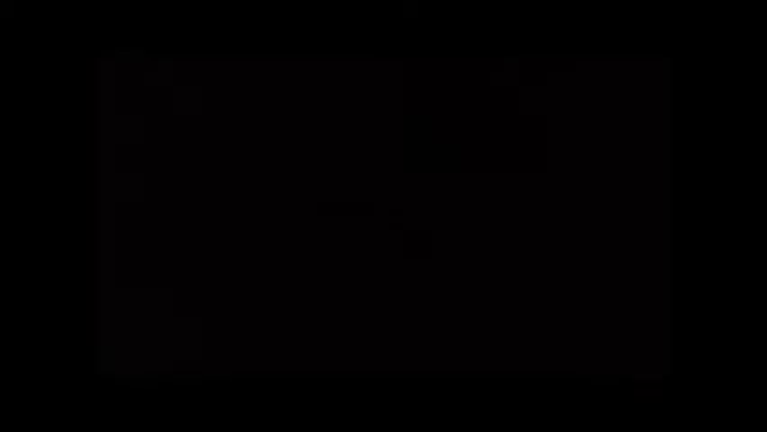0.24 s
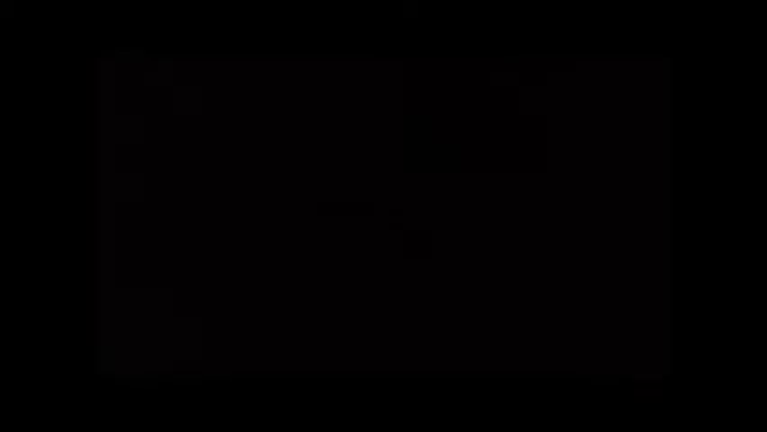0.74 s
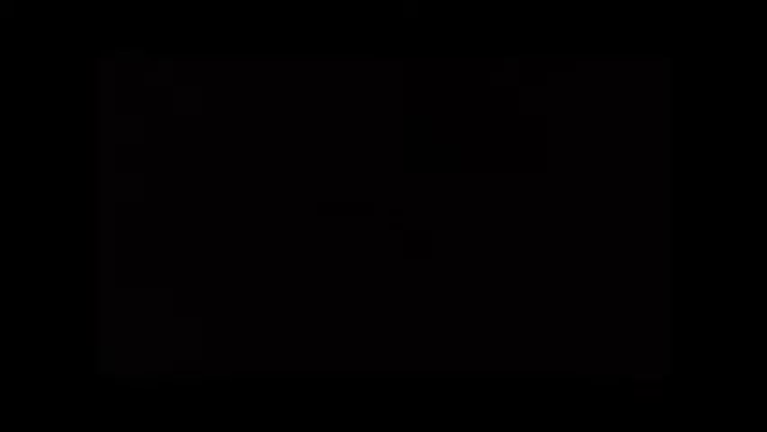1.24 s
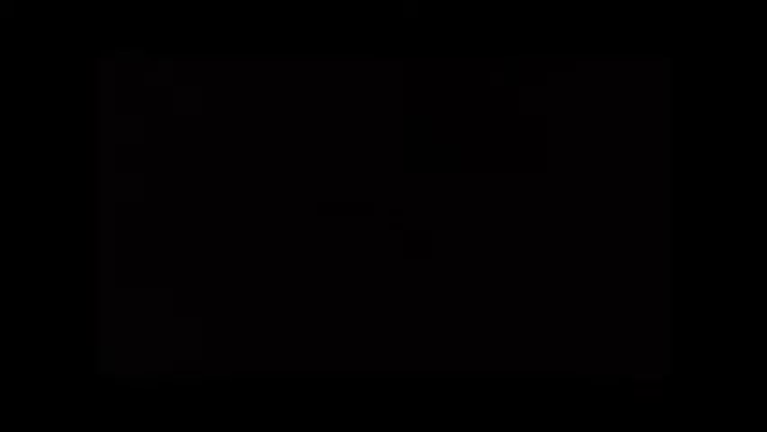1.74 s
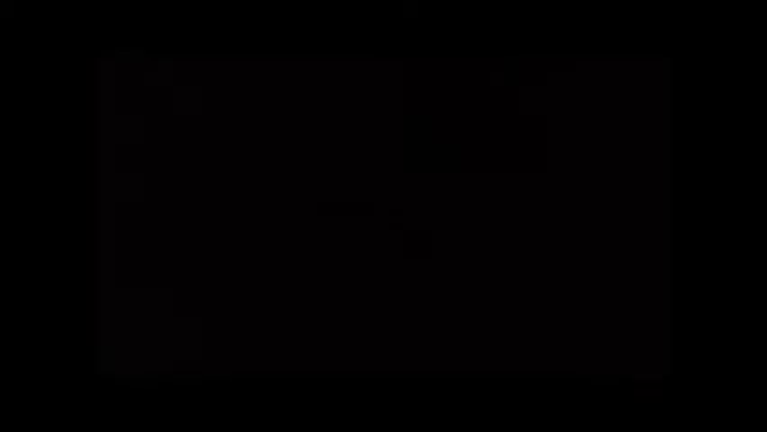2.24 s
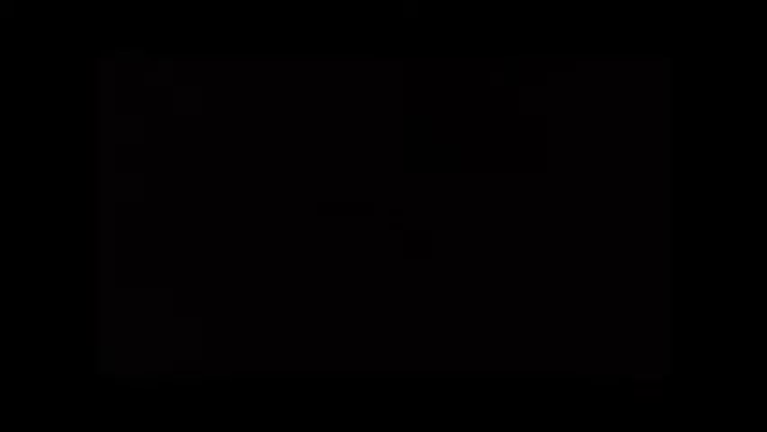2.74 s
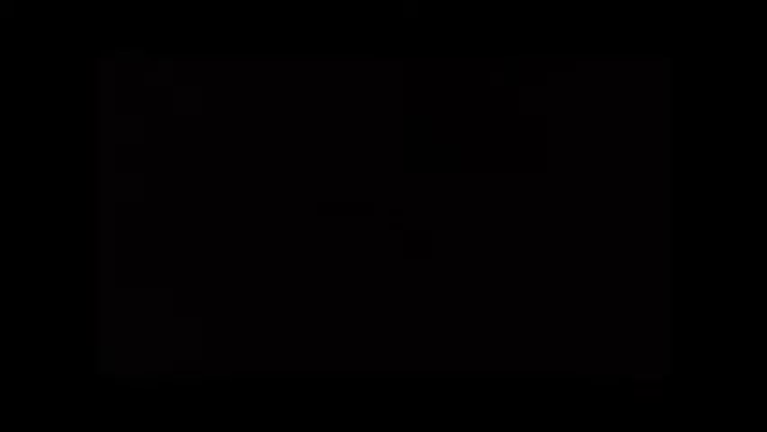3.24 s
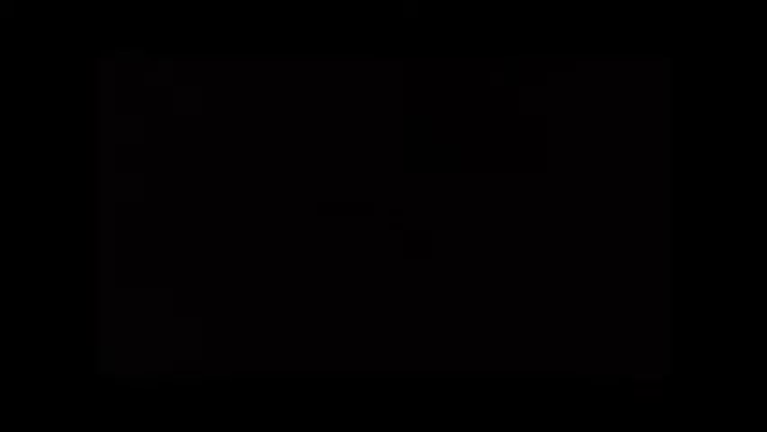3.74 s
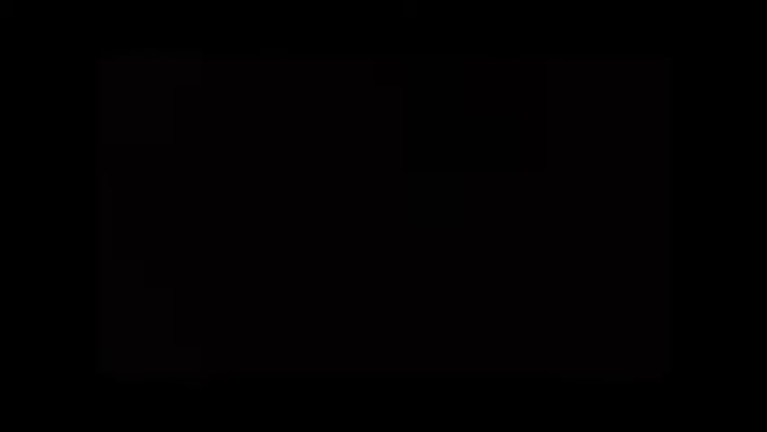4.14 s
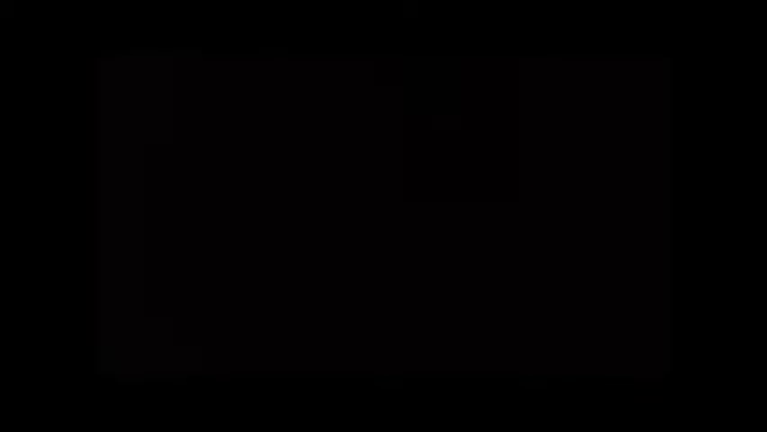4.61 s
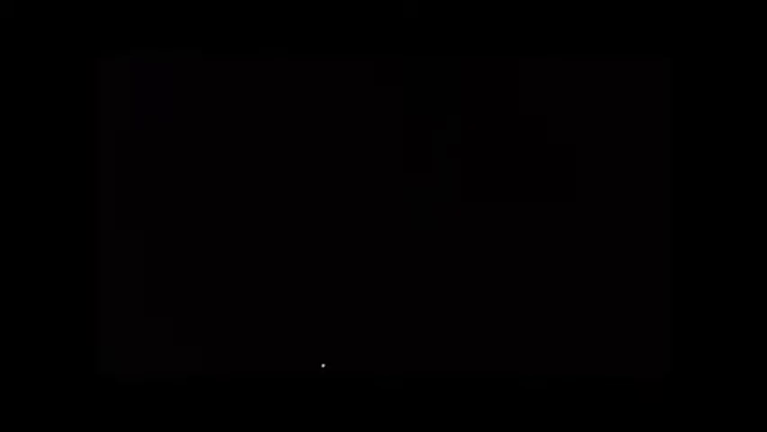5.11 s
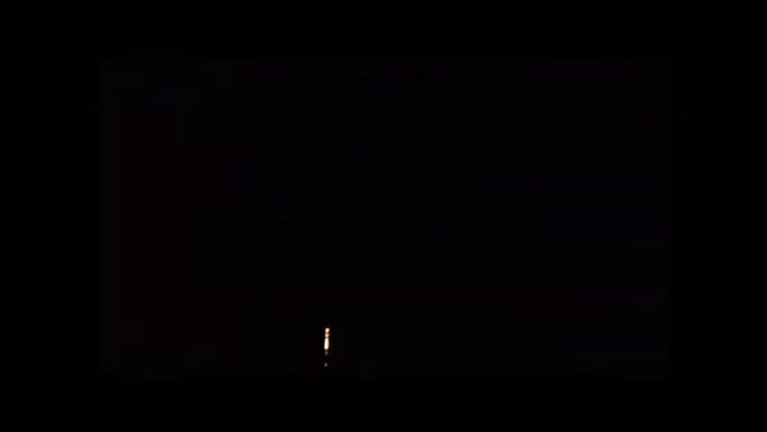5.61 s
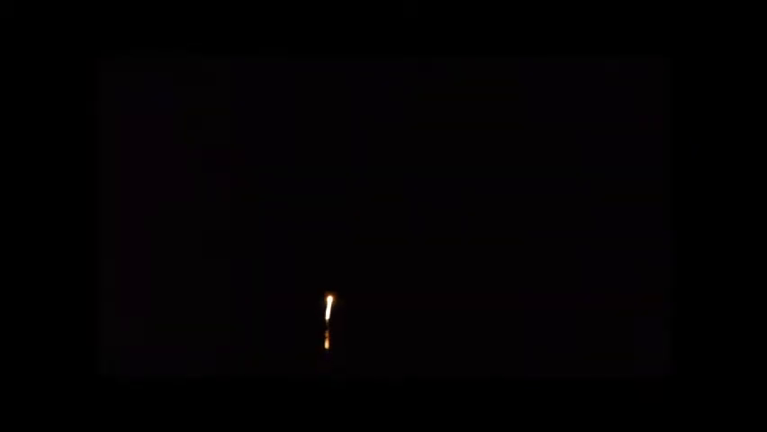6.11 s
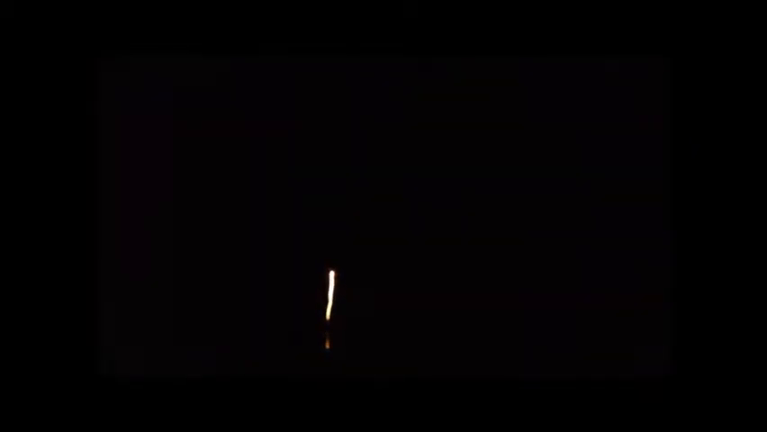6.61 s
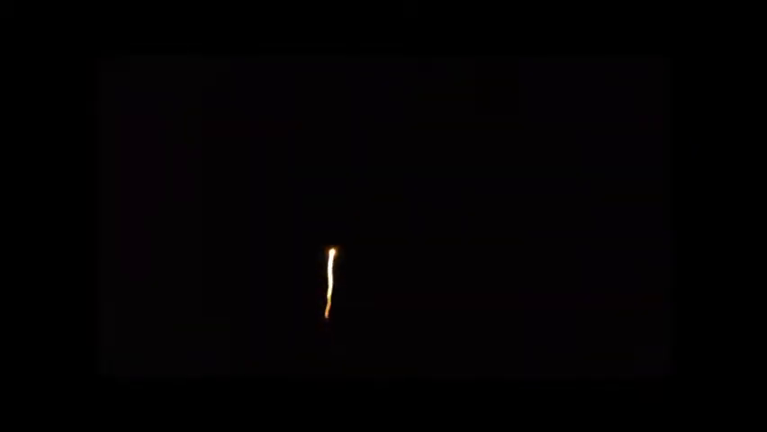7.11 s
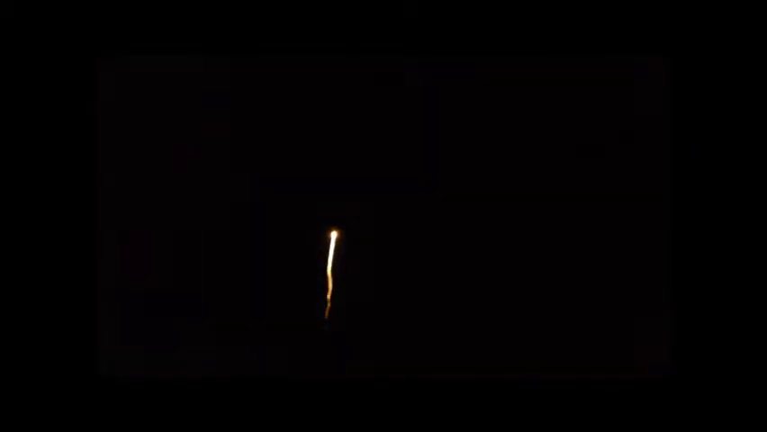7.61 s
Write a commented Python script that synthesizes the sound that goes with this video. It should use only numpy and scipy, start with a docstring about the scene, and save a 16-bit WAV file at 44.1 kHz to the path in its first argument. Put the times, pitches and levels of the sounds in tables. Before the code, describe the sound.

A quiet summer night outdoors, lasting about 7.9 seconds. From the start, several near tree frogs give brief, rasping, upward-sliding croaks around 3.3 to 3.5 kHz, roughly four per second each, overlapping and slipping out of step. Behind them lie a dense blurred frog chorus, shimmering distant insects and soft low air with hiss. A bush cricket buzzes thinly near 9 kHz in three swelling phrases: 0 to 2.2, 2.5 to 4.6 and 4.9 to 6.8. After 3.4 the near croaks turn sparse and faint, and the chorus recedes. Short dry frog rattles come at 5.5 and 6.3, with a barely audible peep at 6.15. At 6.75 a very loud firework bang cracks, with a hollow tube thump, hiss and sparks; the background ducks. Puffs of gas follow at 6.9 and 7.1 to 7.2, then a weaker, duller bang at 7.26, more puffs, and an uneven echo rolling to the end.

```python
"""Summer night with a firework

Tree frogs (larynx pulses ringing a vocal sac) call in turns over a far chorus; a bush cricket buzzes in
long swells of wing strokes, and another frog rattles twice. Then a firework bangs twice with bursts of gas,
shock fronts and sparks, and the bangs roll round the countryside. Far insects and night air (shaped noise)
lie beneath; the recorder's gain ducks at the first bang and creeps back."""
import sys
import numpy as np
from scipy import signal
from scipy.fft import irfft
from scipy.io import wavfile

SR = 44100
rng = np.random.default_rng(int(sys.argv[2]) if len(sys.argv) > 2 else 0)


def to_wav(sig):
    """Store sig (one row per channel, or 1-D mono) as 16-bit WAV at the path in sys.argv[1].

    Samples outside -1..1 are clipped; the rate is SR.
    """
    pcm = np.clip(np.atleast_2d(sig), -1, 1) * 32767
    pcm = np.round(pcm).astype(np.int16)
    wavfile.write(sys.argv[1], SR, pcm.T)  # frames by channels


N = 346626
T = np.arange(N) / SR  # time [s]

# Phrases of the bush cricket: (start [s], end [s], swell time [s])
CRICKET_PHRASES = [(-.1, 2.24, 1.2), (2.498, 4.61, 0.9), (4.852, 6.8, 1.15)]
# Bouts of evenly repeated croaks from near tree frogs:
# (first call [s], last call [s], period [s], call length [s], final pitch [Hz], first level [dB], fading [dB/s])
CROAK_BOUTS = [(.087, 3.202, .26, .104, 3276, -48.0, 0.4), (.308, 1.405, .22, 0.084, 3280, -51.5, 0),
               (1.587, 2.712, .225, 0.083, 3276, -50.0, 0.5), (-.016, 3.342, .258, .092, 3545, -52.5, 0.94)]
# Single croaks, most of them weaker: (time [s], final pitch [Hz], level [dB])
SINGLE_CROAKS = [(3.4, 3250, -52), (3.63, 3320, -56.5), (3.99, 3370, -59.5), (4.27, 3300, -61.5),
                 (4.57, 3290, -62), (4.84, 3700, -64), (5.11, 3570, -63), (6.48, 3650, -65)]
# Upward slide of a croak, larger in lower voices: (final pitch [Hz], slide [share of the pitch])
PITCH_SLIDE = [(3300, 0.13), (3600, .075)]
# Resonance of the frog's body beside its vocal sac: (frequency [Hz], relative level [dB])
BODY_RESONANCE = [(500, -35), (1200, -10), (1470, 5.5), (1750, 3.5), (2100, -4.5), (2400, -1.5),
                  (3300, -7.5), (4100, -8), (5000, -12.5), (5450, -18.5), (7000, -14.5), (9500, -57)]
# Level of the far frogs: (time [s], level [dB])
CHORUS_LEVEL = [(0, -55), (3.6, -57.5), (5.4, -61.5), (6.4, -58.5), (7.86, -57.5)]
# Spectrum of the far insects before their level curve: (frequency [Hz], density [dB per Hz])
INSECT_SPECTRUM = [(5300, -125), (5950, -101), (6400, -101), (6950, -96.5), (7500, -106), (8400, -104),
                   (9200, -108), (9800, -125)]
# Level change of the far insects: (time [s], level [dB])
INSECT_LEVEL = [(0, .5), (3.1, 0), (3.4, -2), (6.6, .3), (7.3, -7), (7.86, -3.5)]
# Night air and microphone hiss before their level changes: (frequency [Hz], density [dB per Hz])
AIR_SPECTRUM = [(25, -102), (60, -107), (110, -96), (200, -89), (270, -90.5), (400, -93), (780, -92.5),
                (1200, -97), (2200, -103), (4000, -108), (5400, -112), (11000, -114.5), (14000, -112)]
# Level change of the low part of the night air: (time [s], level [dB])
LOW_AIR_LEVEL = [(0, -0.2), (2.4, 2.6), (4.0, -0.14), (7.86, 1.5)]
# Rattles of another frog: (start [s], length [s], mid-rattle level [dB])
FROG_RATTLES = [(5.4825, .068, -41.5), (6.3264, 0.1, -37.3)]
# Lesser rushes of gas:
# (peak time [s], level [dB], length [s], upper edge [Hz], tube ring relative to the jet [dB])
GAS_PUFFS = [(6.666, -39.5, 0.037, 6000, -8), (6.889, -29.5, 0.06, 1500, 2.5),
             (7.11, -31.5, 0.023, 7000, -24), (7.183, -26, 0.022, 5500, -7), (7.319, -30, 0.042, 3000, -27),
             (7.475, -32, 0.052, 5000, -7.5), (7.771, -36, .028, 264, -30)]
# Bangs, each a blast of gas, a shock front and an echo:
# (gas peak time [s], gas level [dB], rise [s], fall [s], gas upper edge [Hz], tube ring relative to the jet [dB],
#  shock time [s], shock level before filtering [dB], overpressure time [s], shock upper edge [Hz], echo level [dB])
FIREWORK_BANGS = [(6.7458, 2, 0.0027, 0.0028, 5500, -1, 6.7537, 13, 0.00037, 2840, -25.5),
                  (7.257, -12.5, 0.0061, 0.012, 2960, -14, 7.2602, -1.5, 0.00043, 2080, -36)]
# Colour of the gas jets: (frequency [Hz], relative level [dB])
GAS_COLOUR = [(70, -31), (170, 7.5), (350, 7), (600, 5), (1000, 2), (1520, 5), (1950, -7.5), (3100, -8),
              (4200, -18), (5400, -25), (6400, -20.5), (10000, -33), (15000, -49.5)]
# Colour of the rolling echo: (frequency [Hz], relative level [dB])
ECHO_COLOUR = [(40, -50), (85, -24), (125, -8), (180, 3.5), (260, -1), (400, -13), (540, 0), (640, -10),
               (780, -5.5), (1000, -8.5), (2200, -18.5), (3500, -27), (5000, -35.5), (9000, -56.5)]
# Spectrum of the sparks before their level change: (frequency [Hz], density [dB per Hz])
SPARK_SPECTRUM = [(2000, -112), (5000, -92), (8000, -100), (11000, -103), (14000, -120)]

STROKE_HZ, STROKE_FALL_HZ, STROKE_S = 8940, 1450, 0.0072  # a wing stroke starts high and falls ever faster
SOFT_DB, SOFT_DROP_HZ = -9, 350  # a phrase begins softer and lower
SINGLE_CROAK_S = 0.093
PULSE_SPEEDUP = 0.0898  # share by which the pulses quicken over a croak
CROAK_PEAK_SHARE, CROAK_START_DB, CROAK_END_DB = 0.49, -10.5, -8.5
FAR_LOW_HZ, FAR_SPREAD_HZ, FAR_SPREAD_DB = 3226, 496, 4.5  # the far frogs differ in pitch and loudness
RUMBLE_EDGE_HZ, HISS_DB = 2300, 0.3
CLICK_PERIOD_S, THROAT_HZ = .0169, 2554
RATTLE_EDGE_DB, RATTLE_SAG = -13, .16  # weaker at both ends; share of the pitch lost by the end
PEEP_START_S, PEEP_LENGTH_S, PEEP_HZ, PEEP_DB = 6.15, .12, 2580, -68.5
TUBE_HZ, AFTER_TUBE_DB = 780, -20  # thump and hiss barely ring the tube
# low gulp after a blast, level relative to it
THUMP_LAG_S, THUMP_DB, THUMP_RISE_S, THUMP_FALL_S, THUMP_HZ = .0135, -10, .0024, 0.0069, 400
# the last gas hisses out, level relative to the blast
VENT_LAG_S, VENT_DB, VENT_RISE_S, VENT_FALL_S, VENT_HZ = .021, -16, .01, .011, 11000
PUFF_RISE_SHARE = 0.38
SPARK_DB, SPARK_HOLD_S, SPARK_RELEASE_S = -3.5, 0.11, 0.046
TOP_HZ = 15300  # upper limit of the recorder


def undb(db):
    """Logarithmic levels: decibels become an amplitude gain."""
    return np.exp(np.asarray(db) * (np.log(10) / 20))


def unit(x):
    """Effective value: scale to an rms of 1."""
    return x / np.sqrt(np.mean(x ** 2) + 1e-20)


def curve(rows, at=T):
    """Linear interpolation: straight lines through the rows."""
    return np.interp(at, *np.transpose(rows))


def colour(x, points):
    """Linear filtering: convolve with the impulse response of a spectrum of (Hz, dB) points."""
    hz, db = np.transpose(points)
    f = np.maximum(np.fft.rfftfreq(4096, 1 / SR), 1)
    response = np.fft.fftshift(irfft(undb(np.interp(np.log(f), np.log(hz), db))))
    return signal.oaconvolve(x, response * np.hanning(len(response)), mode="same")


def noise(points):
    """Spectral density: noise with a spectrum given in dB per Hz."""
    return colour(rng.standard_normal(N), points) * np.sqrt(SR / 2)


def edge(x, hz, kind, order=2):
    """Band limiting: a Butterworth low-pass or high-pass."""
    return signal.sosfilt(signal.butter(order, min(hz, SR / 2 - 1), kind, fs=SR, output="sos"), x)


def ring(x, hz, width_hz):
    """Resonance: one peak of given bandwidth."""
    return signal.lfilter(*signal.iirpeak(hz, hz / width_hz, fs=SR), x)


def walk(rate):
    """Random modulation: lines between chance values of spread 1, drawn rate times a second."""
    knots = rng.standard_normal(int(T[-1] * rate) + 2)
    return np.interp(T * rate, np.arange(len(knots)), knots)


def add(out, s, x):
    """Superposition: mix x in from time s."""
    i = int(s * SR)
    lo, hi = max(i, 0), min(i + len(x), N)
    if hi > lo:
        out[lo:hi] += x[lo - i:hi - i]


def scatter(x, t60, wet_db):
    """Diffuse scattering: plants and ground add a short decaying tail."""
    t = T[:SR // 5]
    tail = rng.standard_normal(len(t)) * np.exp(-np.log(1000) * t / t60)
    wet = undb(wet_db)
    return (x + wet * signal.oaconvolve(x, tail / np.linalg.norm(tail))[:N]) / np.hypot(1, wet)


def pulse_train(t, rate, jitter, spread_db, count=300):
    """Quasi-periodic excitation: time since the last uneven pulse, and that pulse's size."""
    chance = rng.standard_normal((count, 2))
    starts = np.append(0, np.cumsum(np.exp(jitter * chance[:-1, 0]) / rate))
    last = np.searchsorted(starts, t, side="right") - 1
    return t - starts[last], undb(spread_db * chance[:, 1])[last]


def bush_cricket(full_db=-65.5):
    """Stridulation: each wing stroke is a short falling chirp; a phrase swells, rises in pitch and holds."""
    out = np.zeros(N)
    for start, end, swell in CRICKET_PHRASES:
        t = T[:int((end - start) * SR)]
        age, size = pulse_train(t, rate=107, jitter=.018, spread_db=1.4)
        soft = np.maximum(1 - t / swell, 0)
        slip = 0.03 * np.cumsum(rng.standard_normal(len(t)))  # the scraper meets the teeth unevenly
        # a third of the fall, because phase is the integral of a quadratic fall in frequency
        mean_hz = STROKE_HZ - SOFT_DROP_HZ * soft - STROKE_FALL_HZ * (age / STROKE_S) ** 2 / 3
        phase = 2 * np.pi * mean_hz * age + slip
        main_stroke = np.exp(-((age - .0032) / 0.0017) ** 2)
        late_stroke = 0.12 * np.exp(-((age - .006) / 0.0013) ** 2)
        buzz = unit(size * (main_stroke + late_stroke) * np.sin(phase))
        add(out, start, buzz * undb(full_db + SOFT_DB * soft))
    return scatter(out, t60=.05, wet_db=-6)


def croak_rows():
    """Independent periods: near frogs each keep a beat and drift in and out of step; single croaks join."""
    calls = [(s, SINGLE_CROAK_S, hz, db) for s, hz, db in SINGLE_CROAKS]
    for first, last, period, length, hz, db, fading in CROAK_BOUTS:
        beats = np.linspace(first, last, round((last - first) / period) + 1)
        calls += [(s, length, hz, db - fading * (s - first)) for s in beats]
    return calls


def croak_swell(share):
    """Amplitude envelope: level in dB along a croak, swelling to a peak and sinking again."""
    before = np.maximum(1 - share / CROAK_PEAK_SHARE, 0)
    after = np.maximum(share - CROAK_PEAK_SHARE, 0) / (1 - CROAK_PEAK_SHARE)
    return CROAK_START_DB * before ** 2 + CROAK_END_DB * after ** 3


def tree_frogs(calls, jitter, body_db):
    """Source and resonator: larynx pulses ring the vocal sac, which rises in pitch as it fills."""
    sac, larynx = np.zeros(N), np.zeros(N)
    for s, length, hz, db in calls:
        t = T[:int(length * SR)]
        share = t / t[-1]
        rate = 220 * np.exp(.05 * rng.standard_normal())  # pulses per second
        warped_t = t * (1 + PULSE_SPEEDUP * (share - 1) / 2)
        age, size = pulse_train(warped_t, rate, jitter, spread_db=1.5)
        age = age / (1 + PULSE_SPEEDUP * (share - .5))  # seconds since the last pulse
        effort = size * undb(croak_swell(share))
        pitch = hz * (1 - curve(PITCH_SLIDE, hz) * (1 - share) ** 2)
        pulse = (1 - np.exp(-age / 0.00061)) * np.exp(-(age / 0.0032) ** 2)
        rasp = rng.standard_normal(SR // 7)[:len(t)]
        add(sac, s, undb(db) * unit(effort * pulse * np.sin(2 * np.pi * pitch * age)))
        add(larynx, s, undb(db) * unit(effort * np.exp(-age / 0.0017) * rasp))
    return sac + undb(body_db) * colour(larynx, BODY_RESONANCE)


def near_frogs():
    """Strong direct sound: croaks of regular pulses with only a weak scattered tail."""
    return scatter(tree_frogs(croak_rows(), jitter=.018, body_db=0), t60=.08, wet_db=-9)


def far_chorus(count=280):
    """Incoherent summation: many tree frogs, each at its own pitch, blurred by distance."""
    calls = []
    for k, (delay, pitch, loss) in enumerate(rng.random((count, 3))):
        s = (k + delay) * T[-1] / count
        calls.append((s, .09, FAR_LOW_HZ + FAR_SPREAD_HZ * pitch, -FAR_SPREAD_DB * loss))
    blurred = scatter(tree_frogs(calls, jitter=0.2, body_db=5), t60=0.26, wet_db=1.5)
    return unit(blurred) * undb(curve(CHORUS_LEVEL))


def far_insects():
    """Incoherent merging: distant crickets form a shimmering noise band with one thin tone in it."""
    bed = noise(INSECT_SPECTRUM) * undb(0.62 * walk(130))
    tone = unit(ring(rng.standard_normal(N), 7040, 40)) * undb(-75)
    return (bed + tone) * undb(curve(INSECT_LEVEL))


def night_air():
    """Broadband ambient noise: a soft far rumble that drifts in level, under steady hiss."""
    air = noise(AIR_SPECTRUM)
    rumble = edge(air, RUMBLE_EDGE_HZ, "low", order=1)
    drift_db = curve(LOW_AIR_LEVEL) + 0.7 * walk(3.82)
    return rumble * undb(drift_db) + (air - rumble) * undb(HISS_DB)


def rattling_frog(uneven_db=3.0):
    """Damped impulses: evenly timed dry clicks of the throat swell, then fade, as their pitch drops."""
    out, t = np.zeros(N), T[:SR // 100]
    for start, length, db in FROG_RATTLES:
        count = max(round(length / CLICK_PERIOD_S), 1)
        for k, chance in enumerate(rng.standard_normal(count)):
            share = (k + .5) / count
            size = undb(db + RATTLE_EDGE_DB * (2 * share - 1) ** 2 + uneven_db * chance)
            hz = THROAT_HZ * (1 - RATTLE_SAG * share ** 2)
            click = np.exp(-((t - .0007) / 0.00063) ** 2) * np.sin(2 * np.pi * hz * t)
            add(out, start + k * CLICK_PERIOD_S, size * click)
    return scatter(out, t60=0.057, wet_db=-10)


def peep():
    """Phase-modulated sinusoid: one faint, nearly pure animal note."""
    out, t = np.zeros(N), T[:int(PEEP_LENGTH_S * SR)]
    waver = 0.025 * np.cumsum(rng.standard_normal(len(t)))
    note = np.hanning(len(t)) * np.sin(2 * np.pi * PEEP_HZ * t + waver)
    add(out, PEEP_START_S, undb(PEEP_DB) * unit(note))
    return out


def rush_rows():
    """Sequence of outflow: a low thump and a hiss follow every blast; lesser puffs stand alone."""
    rushes = []
    for s, db, rise, fall, top_hz, tube_db, *_ in FIREWORK_BANGS:
        rushes += [(s, db, rise, fall, top_hz, tube_db),
                   (s + THUMP_LAG_S, db + THUMP_DB, THUMP_RISE_S, THUMP_FALL_S, THUMP_HZ, AFTER_TUBE_DB),
                   (s + VENT_LAG_S, db + VENT_DB, VENT_RISE_S, VENT_FALL_S, VENT_HZ, AFTER_TUBE_DB)]
    for s, db, length, top_hz, tube_db in GAS_PUFFS:
        rise, fall = PUFF_RISE_SHARE * length, (1 - PUFF_RISE_SHARE) * length
        rushes.append((s, db, rise, fall, top_hz, tube_db))
    return rushes


def gas_rushes():
    """Jet noise and pipe resonance: burning powder drives gas out of a tube, which sounds to varying degrees."""
    out, gas = np.zeros(N), noise(GAS_COLOUR)
    t = T[:SR // 2] - 1 / 4  # time from the peak
    for s, db, rise, fall, top_hz, tube_db in rush_rows():
        swell = np.exp(np.minimum(t / rise, -t / fall))
        jet = edge(np.roll(gas, rng.integers(N))[:len(t)], top_hz, "low") * swell
        tube = swell * np.sin(2 * np.pi * TUBE_HZ * t + rng.uniform(0, 2 * np.pi))
        peak = undb(db) * np.sqrt(np.mean(swell ** 2))  # makes the level hold at the peak
        add(out, s + t[0], peak * (unit(jet) + undb(tube_db) * unit(tube)))
    return out


def rolling_echo(low_t60=3.12, high_t60=3.46):
    """Multiple reflection: trees and slopes return a long uneven roll whose bass dies slightly sooner."""
    out = np.zeros(N)
    for s, *_, db in FIREWORK_BANGS:
        lumps = undb(2.2 * walk(60))
        roll = unit(noise(ECHO_COLOUR)) * lumps
        low = edge(roll, 900, "low", order=1)
        age = np.maximum(T - s, 0)
        fade_low, fade_high = (np.exp(-np.log(1000) * age / t60) for t60 in (low_t60, high_t60))
        onset = 1 - np.exp(-age / 0.014)
        out += undb(db) * onset * (low * fade_low + (roll - low) * fade_high)
    return out


def sparks():
    """Modulated noise: each bang throws out sparks that sputter briefly and die."""
    burn = np.zeros(N)
    for s, *_ in FIREWORK_BANGS:
        burn += (T > s) * np.exp(-np.maximum(T - s - SPARK_HOLD_S, 0) / SPARK_RELEASE_S)
    return noise(SPARK_SPECTRUM) * undb(SPARK_DB + 2.5 * walk(440)) * burn


def cracks():
    """Blast wave: a shock front with its suction, then its duller reflection from a nearby surface."""
    out, t = np.zeros(N), T[:SR // 50]
    for *_, s, db, width, top_hz, _ in FIREWORK_BANGS:
        shock = undb(db) * (1 - t / width) * np.exp(-t / width)
        add(out, s, 1.4 * edge(shock, top_hz, "low"))
        add(out, s + .004, .9 * edge(shock, .7 * top_hz, "low"))
    return edge(out, 130, "high")


def scene():
    """Superposition at one microphone: frogs, insects, air and firework."""
    animals = bush_cricket() + near_frogs() + far_chorus() + far_insects() + rattling_frog() + peep()
    firework = gas_rushes() + rolling_echo() + sparks() + cracks()
    return (animals + night_air() + edge(firework, 55, "high"))[None]


def record(dry, threshold_db=-12.5, attack_s=0.0056, recovery_db_per_s=7.0):
    """Dynamic compression: gain ducks fast, recovers slowly; remaining peaks clip; bass and top are cut."""
    keep = np.exp(-1 / (attack_s * SR))
    power = signal.lfilter([1 - keep], [1, -keep], dry[0] ** 2)
    over_db = np.maximum(10 * np.log10(power + 1e-18) - threshold_db, 0)
    # the running maximum of a tilted level recovers along a straight line in dB
    duck_db = np.maximum.accumulate(over_db + recovery_db_per_s * T) - recovery_db_per_s * T
    clipped = np.clip(dry * undb(-duck_db), -.88, .88)
    bass_cut = edge(clipped, 80, "high", order=3)
    return signal.sosfilt(signal.ellip(10, .1, 70, TOP_HZ, fs=SR, output="sos"), bass_cut)


dry = scene()
out = record(dry)
to_wav(out)
```